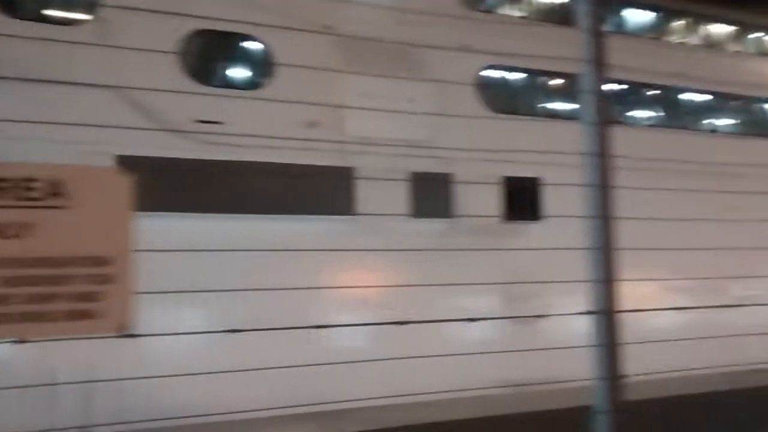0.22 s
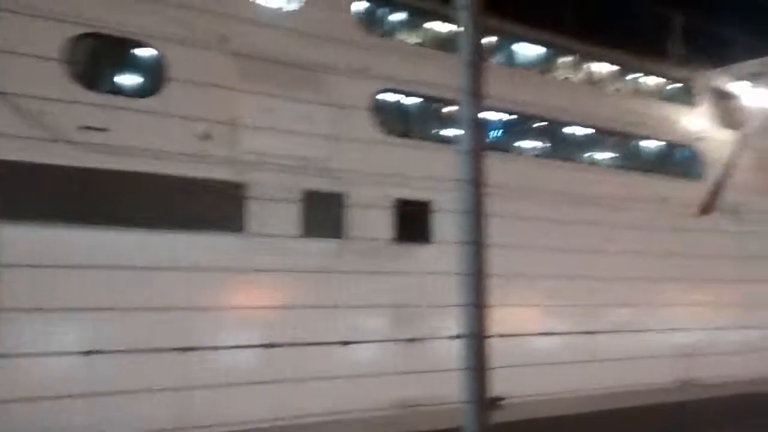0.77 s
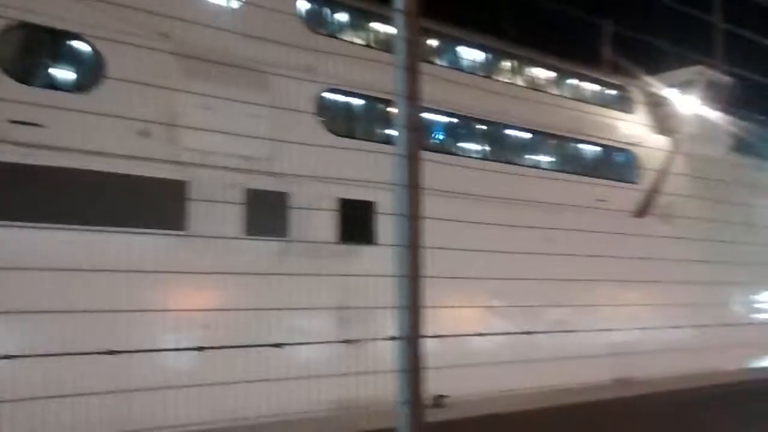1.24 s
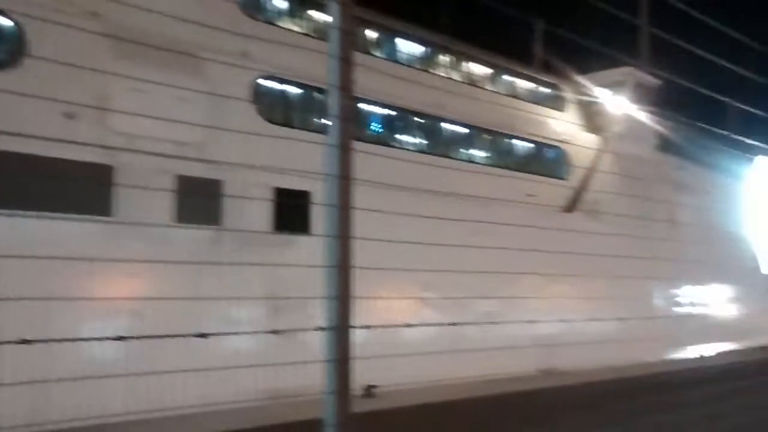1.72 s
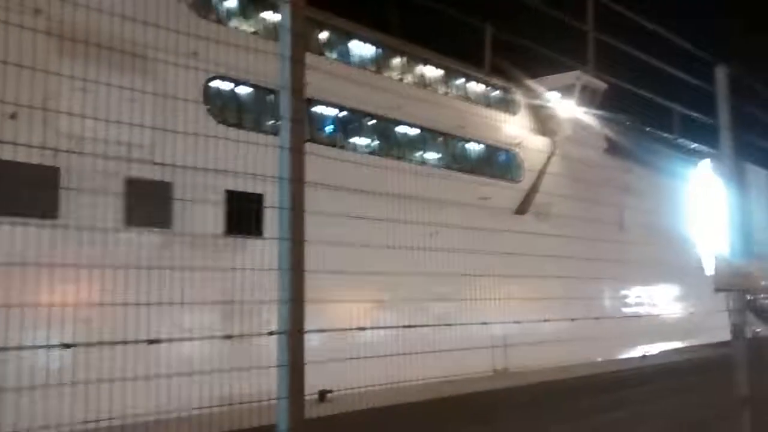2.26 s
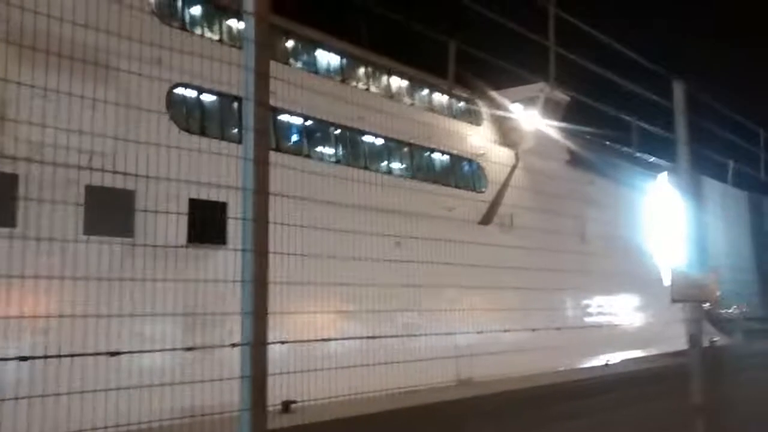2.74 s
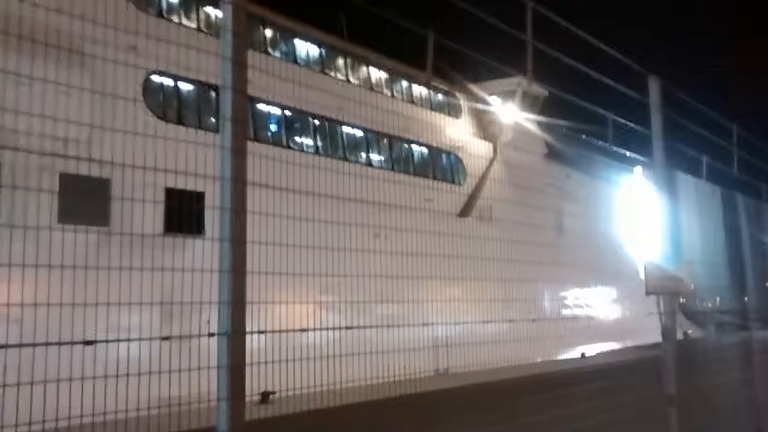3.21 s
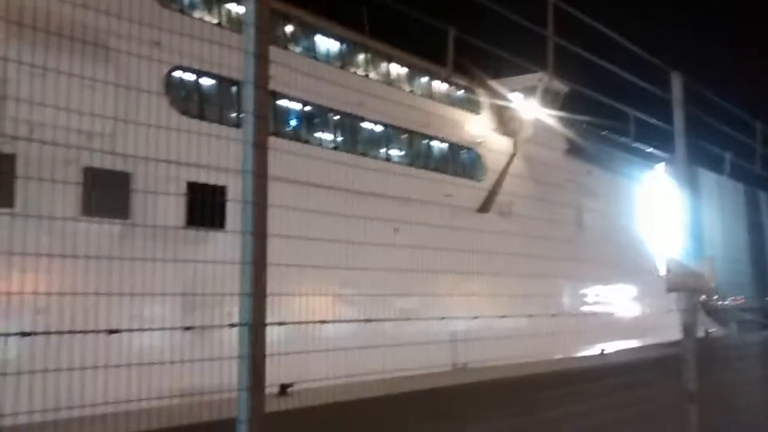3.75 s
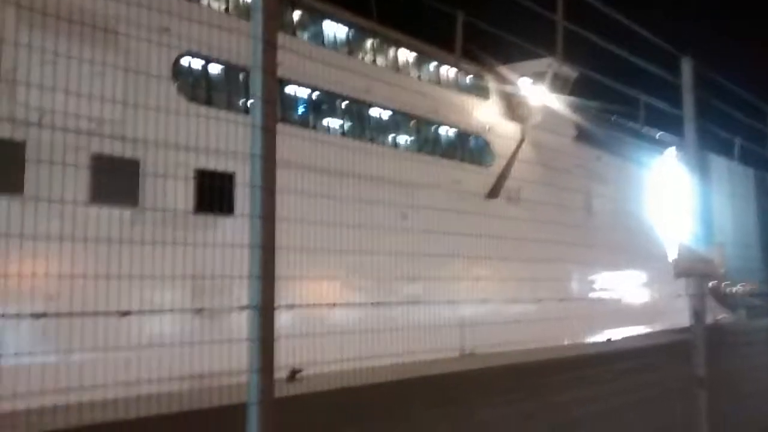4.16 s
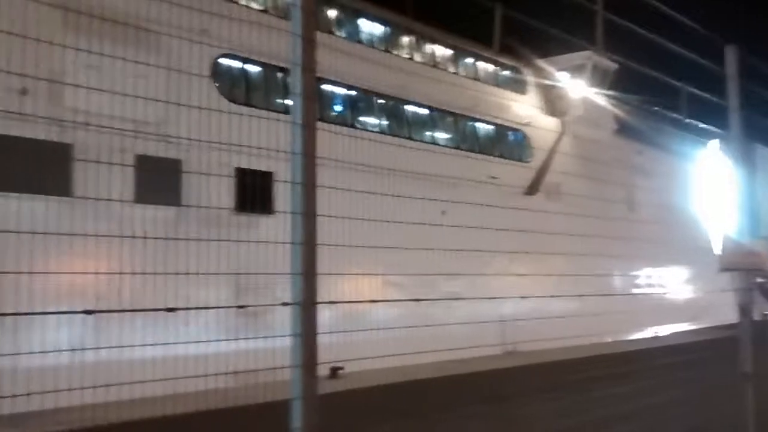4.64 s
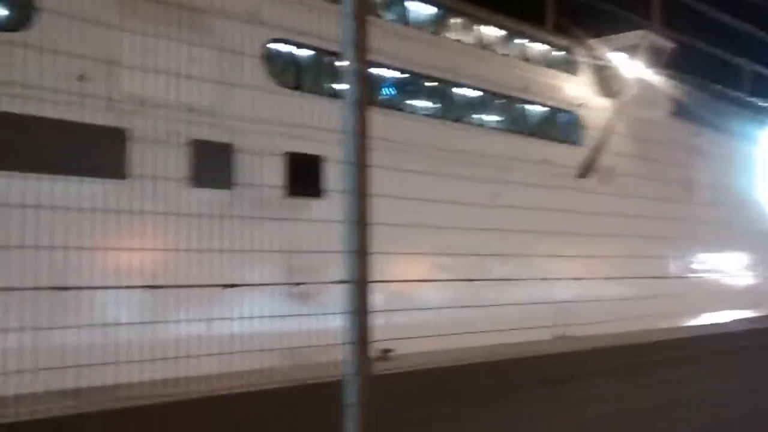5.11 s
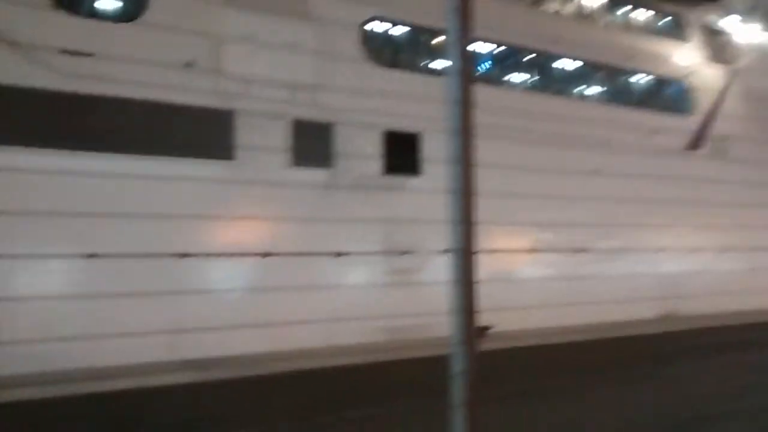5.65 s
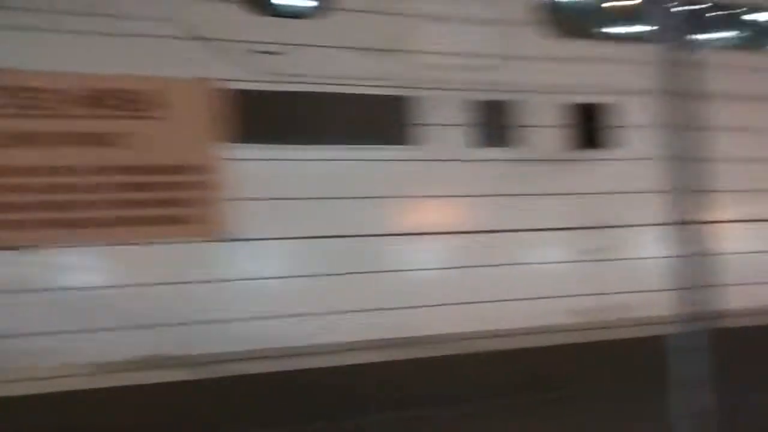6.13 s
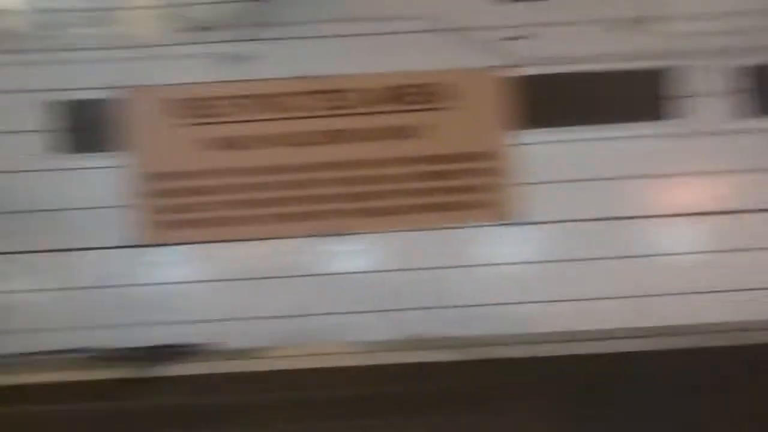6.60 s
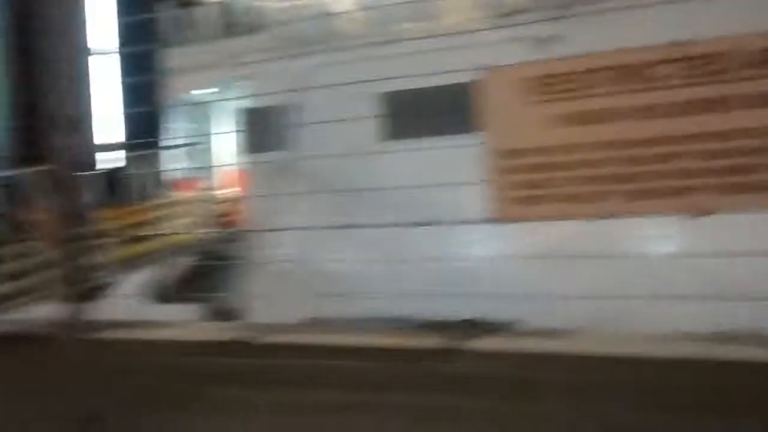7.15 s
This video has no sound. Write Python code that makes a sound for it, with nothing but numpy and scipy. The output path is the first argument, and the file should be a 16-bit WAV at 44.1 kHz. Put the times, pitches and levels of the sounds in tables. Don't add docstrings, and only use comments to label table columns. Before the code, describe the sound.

Continuous loud fan noise from a ship, ringing as if through ducts, with a fluttering steady whine and buzzing low hum underneath. Outdoors, heard on a turning hand-held device whose left and right channels differ. Gusts rumble and sharp dull pops strike the microphone, densest early on, scattered in the middle, pattering again at the end; the level dips after the hardest hits.

```python
import sys
import numpy as np
from scipy import signal
from scipy.fft import rfft, irfft
from scipy.io import wavfile
from scipy.ndimage import uniform_filter1d

SR = 44100
rng = np.random.default_rng(int(sys.argv[2]) if len(sys.argv) > 2 else 0)


def generate_wav(signal):
    frames = np.transpose(np.atleast_2d(signal))
    scaled = np.clip(frames, -1, 1) * 32767
    pcm = np.round(scaled).astype(np.int16)
    wavfile.write(sys.argv[1], SR, pcm)


def to_linear_factor(level_db):
    exponent = np.asarray(level_db, float) / 20
    return 10 ** exponent


N = 325398
T = np.arange(N) / SR
HZ = np.maximum(np.fft.rfftfreq(N, 1 / SR), 1)


def level(x, db):
    return x * to_linear_factor(db) / np.sqrt(np.mean(x ** 2))


def shape(table, column=1):
    rows = np.array(table, float)
    return np.interp(np.log(HZ), np.log(rows[:, 0]), rows[:, column])


def curve(table):
    return np.interp(T, *np.transpose(table))


def walk(rate):
    hold = int(SR / rate)
    steps = np.repeat(rng.standard_normal(N // hold + 1), hold)
    x = uniform_filter1d(uniform_filter1d(steps, hold), hold)[:N]
    return x / x.std()


def band(x, lo_hz, hi_hz, order=2):
    return signal.sosfilt(signal.butter(order, [lo_hz, hi_hz], "band", fs=SR, output="sos"), x)


def low_cut(x, hz):
    return signal.sosfilt(signal.butter(1, hz, "high", fs=SR, output="sos"), x)


# frequency [Hz], density [dB per Hz].
AIR_FLOW = [(15, -33), (40, -13.5), (100, -12.5), (300, -21), (420, -18), (700, -14.5), (1100, -10),
            (1700, -12.5), (2650, -25.5), (3800, -17.5), (4600, -26), (6000, -44), (7500, -61),
            (14500, -67.5)]
# centre [Hz], width [Hz], density at the top [dB per Hz].
DUCT_RINGS = [(309, 84, -11.5), (391.5, 16.7, -6), (459, 35.5, -3), (492, 62, -3), (533, 46, -5.5),
              (593, 98, -11.5), (803.3, 38.5, -4), (866, 44, -5.5), (964, 90, -6), (1208, 37, -10.5),
              (1466, 99, -9), (6235, 760, -41.5), (8270, 460, -48.5), (10000, 1220, -57),
              (13200, 3100, -58.5)]


def roar():
    power = to_linear_factor(shape(AIR_FLOW)) ** 2
    for hz, width, db in DUCT_RINGS:
        power = power + to_linear_factor(db) ** 2 / (1 + (2 * (HZ - hz) / width) ** 4)
    middle = (HZ > 400) & (HZ < 1100)
    return np.sqrt(power / (power[middle].sum() / len(HZ)))


BLADE_HZ, BLADE_WANDER, BLADE_FLUTTER_DB = 494.0, .0008, 2.0
# multiple of the blade rate, level against the roar [dB].
BLADE_TONES = [(1, -10.5), (2, -9), (3, -15), (4, -22), (5, -30)]


def blades():
    turn = 2 * np.pi * np.cumsum(BLADE_HZ * (1 + BLADE_WANDER * walk(12))) / SR
    tones = sum(to_linear_factor(db + BLADE_FLUTTER_DB * walk(10)) * np.sin(k * turn + k * k) for k, db in BLADE_TONES)
    return np.sqrt(2) * tones


GENERATOR_HZ = 74.9
PUMP_HZ, PUMP_DB = 251, -21
# multiple, level against the roar [dB], side minus mid [dB].
GENERATOR_ORDERS = [(1, -21.5, -5), (2, -19, -13), (3, -12.5, -4.5), (6, -19, -3), (9, -23.5, -13)]


def generator():
    pump = to_linear_factor(PUMP_DB + 1.5 * walk(5)) * np.sin(2 * np.pi * PUMP_HZ * T + .3 * walk(4))
    out = pump * np.array([[1], [.5]])
    for k, db, side_db in GENERATOR_ORDERS:
        hum = to_linear_factor(db + .6 * walk(2)) * np.sin(2 * np.pi * k * GENERATOR_HZ * T + k * k)
        out = out + hum * to_linear_factor(np.array([[0], [side_db]]))
    return np.sqrt(2) * out


def ports(table, direct, lines, diffuse):
    turned = [(hz, like * np.cos(rad), like * np.sin(rad)) for hz, _, like, rad in table]
    like = shape(turned) + 1j * shape(turned, column=2)
    rest = np.sqrt(np.clip(1 - np.abs(like) ** 2, 0, 1))
    return to_linear_factor(shape(table)) * (like * (direct + 1.1 * lines) + rest * diffuse)


# frequency [Hz], gain [dB].
BODY_RIGHT = [(1800, -0.5), (2200, 0.3), (2500, -0.5), (2700, -3), (2950, -3), (3250, 0.5), (3600, 1.4),
              (3950, -1), (4400, 0.5), (4900, -3), (5600, 0), (6500, -0.5), (7500, 4.5), (8600, -3.5)]
BODY_AHEAD = [(1800, 0.0), (2200, -1), (2500, -2), (2700, 0), (2950, 5), (3250, 1.5), (3600, -2),
              (3950, 2.6), (4400, 2.3), (4900, 0.5), (5600, -0.3), (6500, 0), (7500, -2.5), (8600, 2.5)]
BODY_LEFT = [(1800, 0.0), (2200, 2.2), (2500, -1.5), (2700, 1), (2950, 3.5), (3250, 3.5), (3600, 0.6),
             (3950, 0), (4400, 2), (4900, 1.2), (5600, 1), (6500, 1.5), (7500, 2.5), (8600, -2.5)]
# frequency [Hz], side minus mid [dB], likeness [0-1], phase [rad].
PORTS_RIGHT = [(60.0, 3.0, 0.28, 0.0), (230.0, -3.0, 0.87, 0.5), (480.0, -8.0, 0.68, -0.3),
               (700.0, -10.0, 0.4, 0.0), (950.0, -17.0, 0.24, 0.2), (1200.0, -18.0, 0.52, 2.5),
               (1600.0, -5.0, 0.77, 2.7), (2000.0, 4.0, 0.88, 2.6), (2500.0, 11.0, 0.79, 2.4),
               (3000.0, 7.0, 0.36, -2.0), (3700.0, -6.0, 0.54, 2.6), (4400.0, 2.0, 0.73, -2.5),
               (5200.0, 3.0, 0.5, -1.4), (6600, -5, 0.1, -0.5), (7500, -1, 0.4, 0)]
PORTS_AHEAD = [(60.0, 4.0, 0.09, 2.7), (230.0, -4.0, 0.79, 0.5), (480.0, -12.0, 0.44, -1.5),
               (950.0, -17.0, 0.65, -2.0), (1200.0, -19.0, 0.69, -2.0), (1600.0, -13.0, 0.25, -2.7),
               (2000.0, -4.0, 0.14, 3.1), (2500.0, 5.0, 0.13, 2.7), (3000.0, -2.0, 0.64, -2.4),
               (3700.0, -7.0, 0.72, 3.1), (4400.0, -3.0, 0.71, -2.5), (5200.0, 2.0, 0.65, -2.7),
               (6600, -4, 0.2, 1.0), (7500, 1, 0.4, 0.1)]
PORTS_LEFT = [(60.0, 1.0, 0.34, -0.4), (230.0, -5.0, 0.79, 0.2), (480.0, -6.0, 0.71, -2.9),
              (950.0, -10.0, 0.96, -2.0), (1200.0, -11.0, 0.81, -1.4), (1600.0, -2.0, 0.64, -0.3),
              (2000.0, 7.0, 0.84, 1.6), (2500.0, 11.0, 0.7, 2.4), (3000.0, 1.0, 0.48, 1.8),
              (3700.0, -8.0, 0.7, 2.8), (4400.0, -3.0, 0.7, -2.9), (5200.0, 3.0, 0.76, -2.6),
              (6600, -3, 0.4, 2.0), (7500, 1, 0.45, 0)]


def fans(aim):
    direct, diffuse = (roar() * rfft(rng.standard_normal(N)) for _ in range(2))
    lines = rfft(blades())
    shares = [np.clip(-aim, 0, 1), np.clip(1 - np.abs(aim), 0, 1), np.clip(aim, 0, 1)]
    aims = [(BODY_RIGHT, PORTS_RIGHT), (BODY_AHEAD, PORTS_AHEAD), (BODY_LEFT, PORTS_LEFT)]
    heard = 0
    for share, (body, pair) in zip(shares, aims):
        side = ports(pair, direct, lines, diffuse)
        heard = heard + share * irfft(to_linear_factor(shape(body)) * np.array([direct + lines, side]), N)
    return heard * np.array([np.ones(N), np.maximum(np.abs(aim), 1)])


FACING_AIM, FACING_SPAN = -0.27, 0.57
SHADOW_HZ, SHADOW_DB, SHADOW_OCTAVES = 1660, -5.5, .4
# centre [Hz], level [dB], extra when the ports face the fans [dB].
TREBLE_ZONES = [(1540, 0, 2), (2400, 1, 3.3), (3930, -0.92, 2.03), (9000, 4.5, -4.2)]


def shade_db(aim):
    facing = np.exp(-((aim - FACING_AIM) / FACING_SPAN) ** 2)
    notch_hz = SHADOW_HZ / np.clip(aim, 1e-2, None)
    return [db + extra_db * facing + SHADOW_DB * np.exp(-(np.log2(hz / notch_hz) / SHADOW_OCTAVES) ** 2)
            for hz, db, extra_db in TREBLE_ZONES]


SHIMMER_DB = .7
ZONE_EDGES_HZ = [1130, 1900, 2800, 6900]


def shimmer(heard, aim):
    spectra = rfft(heard)
    above = [1] + [1 / (1 + (hz / HZ) ** 12) for hz in ZONE_EDGES_HZ] + [0]
    gains = [1] + [to_linear_factor(db + SHIMMER_DB * walk(11)) for db in shade_db(aim)]
    return sum(gain * irfft((above[k] - above[k + 1]) * spectra, N) for k, gain in enumerate(gains))


NULL_HZ, NULL_WIDTH_HZ, NULL_AIM, NULL_SPAN = 7550, 1100, -.6, .2


def cancel(mid, aim):
    null = irfft(rfft(mid) / (1 + (2 * (HZ - NULL_HZ) / NULL_WIDTH_HZ) ** 8), N)
    return mid - null * np.exp(-((aim - NULL_AIM) / NULL_SPAN) ** 4)


DUCK_ATTACK_S, DUCK_RELEASE_S = 0.0044, 0.37
# start [s], depth [dB].
DUCKS = [
    (1.252, 4.5),
    (1.587, 5.5),
    (1.893, 6),
    (3.546, 4.5),
    (4.38, 2),
    (4.52, 2),
]


def ducking_db():
    late = [(np.maximum(T - s, 0), db) for s, db in DUCKS]
    return -sum(db * (1 - np.exp(-t / DUCK_ATTACK_S)) * np.exp(-t / DUCK_RELEASE_S) for t, db in late)


GENERATOR_TURN_DB = -2
# time [s], aim [-1 right along the hull, 0 square on, 1 left].
AIM = [(0, 0.35), (.5, 0.17), (1.3, -0.38), (1.9, -0.83), (2.2, -1.08), (3.5, -1.1), (4.8, -0.96),
       (5.1, -0.64), (5.45, -.5), (5.9, -0.049), (6.3, 0.41), (6.7, 0.98), (7.38, 1.28)]
# time [s], level [dB].
ROAR_LEVEL = [(0.0, -19.5), (0.15, -20.5), (0.35, -17.5), (0.55, -20.5), (0.75, -19), (1.0, -20.5),
              (1.5, -22), (2.15, -21), (2.9, -19), (4.0, -18.5), (5.2, -19), (5.45, -18.5), (5.7, -18.5),
              (6.25, -19), (6.4, -21), (6.6, -18.5), (7.1, -20), (7.38, -20.5)]


def ship():
    aim = curve(AIM)
    mid, side = shimmer(fans(aim), aim)
    air = np.array([cancel(mid, aim), side])
    hum = generator() * to_linear_factor([0 * aim, GENERATOR_TURN_DB * aim])
    return (air + hum) * to_linear_factor(curve(ROAR_LEVEL) + ducking_db() + .5 * walk(9))


EDDY_DB, EDDY_SCATTER_DB, EDDY_MS = -13.5, 1.3, 2.05
# time [s], peak [dB], sign, width [ms].
PUFFS = [(0.415, -10.9, -1, 2.5), (0.9376, -7.0, -1, 1.9), (0.9523, -9.7, -1, 1.7), (1.0302, -6.6, -1, 2.1),
         (1.0566, -10.2, -1, 1.8), (1.1413, -9.7, 1, 2.4), (1.1824, -11.0, -1, 1.7),
         (1.2509, -5.1, -1, 1.9), (1.3011, -8.5, -1, 1.8), (1.3958, -11.0, -1, 2.0),
         (1.5061, -11.5, -1, 1.5), (1.5737, -6.2, -1, 1.6), (1.5876, -4.6, -1, 1.4), (1.6339, -11, -1, 1.7),
         (1.678, -11.5, 1, 1.6), (1.7019, -11.6, -1, 2.2), (1.8888, -4.6, -1, 1.5), (1.8966, -7.1, -1, 1.4),
         (1.9799, -11.3, -1, 1.7), (3.0303, -10.7, 1, 1.4), (3.1308, -8.2, 1, 1.8), (3.5468, -6.3, 1, 1.9),
         (4.3813, -9.3, -1, 2.0), (4.499, -9.0, -1, 1.8), (4.5225, -9.5, -1, 1.7), (4.5713, -11.2, -1, 1.5),
         (6.2507, -11.3, -1, 1.9), (7.2019, -9.2, 1, 2.0), (7.3213, -10.2, 1, 3.1), (7.358, -9.8, -1, 1.8)]
# start [s], end [s], rate [per second].
FLURRIES = [
    (.42, .63, 19),
    (.88, 1.24, 33),
    (1.32, 1.57, 16),
    (3.11, 3.15, 50),
    (3.43, 3.54, 27),
    (4.4, 4.55, 13),
    (6.95, 7.37, 10),
]


def eddies():
    rows = list(PUFFS)
    for start, end, rate in FLURRIES:
        for when, size, side, width in rng.random((round((end - start) * rate), 4)):
            peak_db = EDDY_DB + EDDY_SCATTER_DB * 3 * (size - .5)
            width_ms = EDDY_MS * (.75 + .5 * width)
            rows.append((start + when * (end - start), peak_db, side - .75, width_ms))
    return rows


def thumps():
    push = np.zeros(N)
    near = np.arange(-400, 400)
    for s, db, sign, ms in eddies():
        at = np.clip(int(s * SR) + near, 0, N - 1)
        push[at] += np.sign(sign) * to_linear_factor(db + 5.5) * np.exp(-(near / (SR * ms * 0.00064)) ** 2)
    return low_cut(push, 115)


LULL_DB = -36.5
# time [s], peak [dB], half length [s].
GUSTS = [(.0, -32, .08), (.3, -36, .1), (.58, -30, .2), (1.04, -23, 0.21), (1.355, -19, 0.088),
         (1.567, -17, 0.11), (1.98, -28, .1), (2.2, -31, .12), (2.45, -36, .12), (3.03, -23.5, 0.13),
         (3.48, -26, .07), (3.95, -32, .15), (4.45, -25, .14), (5.076, -27, .08), (5.36, -31, .14),
         (5.716, -27, .08), (6.07, -26, 0.074), (6.24, -29, .07), (6.36, -27, .04), (6.98, -24, .1),
         (7.264, -17, 0.12)]


def wind():
    lumps = rng.standard_normal(N) * to_linear_factor(3.5 * walk(40))
    low_pass = signal.butter(4, 330, fs=SR, output="sos")
    rumble = signal.sosfilt(low_pass, band(lumps, 26, 130, order=1))
    gusts = sum(to_linear_factor(db) * np.exp(-((T - s) / half) ** 2) for s, db, half in GUSTS)
    side = level(rumble, -1.0) * (to_linear_factor(LULL_DB) + gusts) + thumps()
    mid = -to_linear_factor(-5.0) * low_cut(side, 220)
    return mid, side


def scene():
    mid, side = np.add(ship(), wind())
    return np.array([mid + side, mid - side])


def band_limit(x):
    return signal.sosfilt(signal.butter(12, 15720, fs=SR, output="sos"), x)


def record(dry):
    limited = np.clip(dry, -.98, .98)
    dull = signal.sosfilt(signal.ellip(8, .2, 60, 15020, fs=SR, output="sos"), limited)
    return band_limit(dull)


dry = scene()
out = record(dry)
generate_wav(out)
```